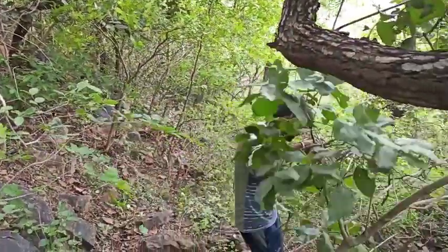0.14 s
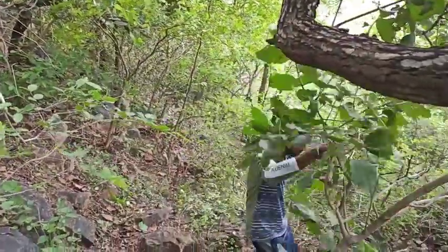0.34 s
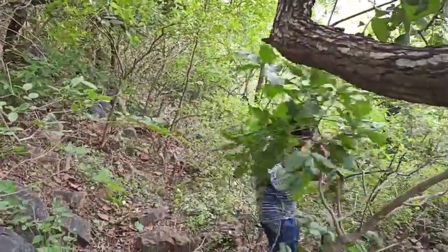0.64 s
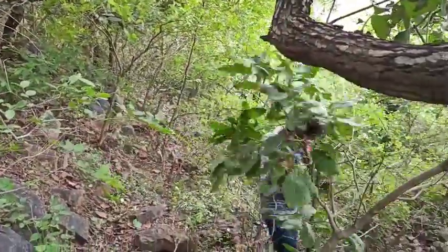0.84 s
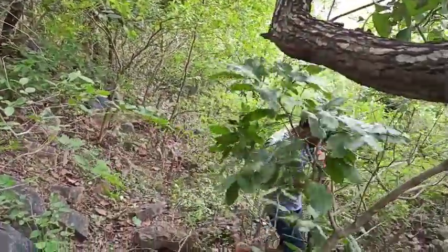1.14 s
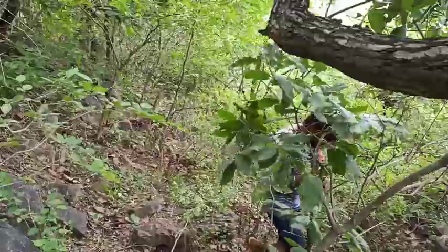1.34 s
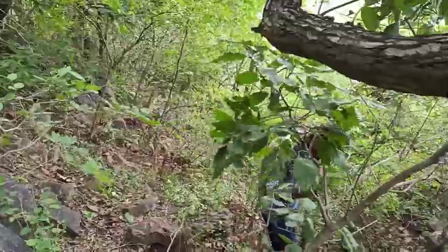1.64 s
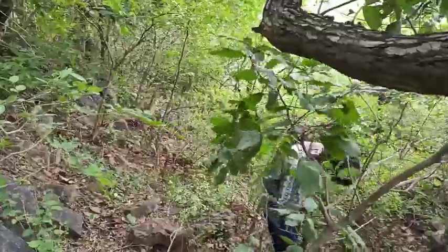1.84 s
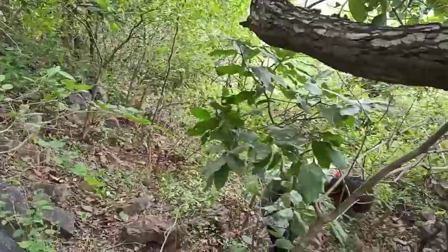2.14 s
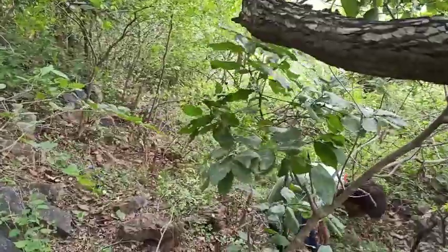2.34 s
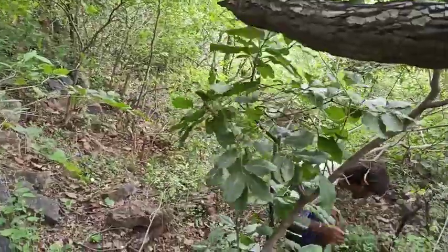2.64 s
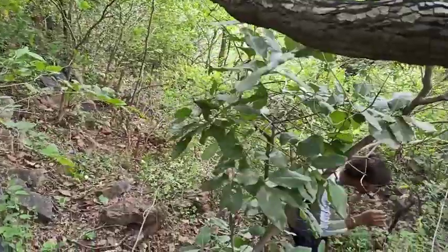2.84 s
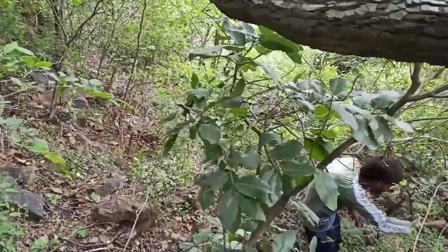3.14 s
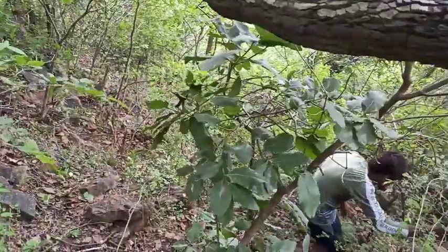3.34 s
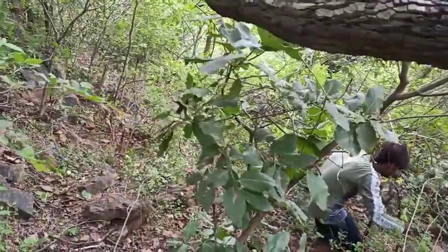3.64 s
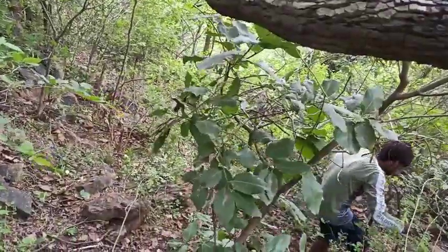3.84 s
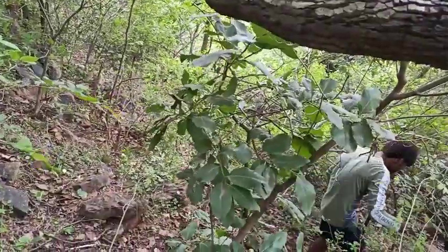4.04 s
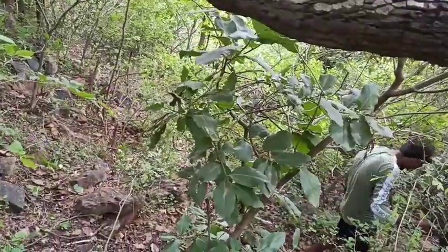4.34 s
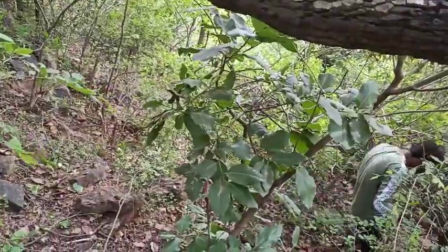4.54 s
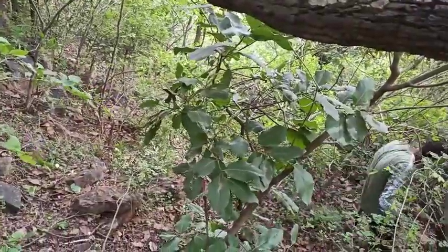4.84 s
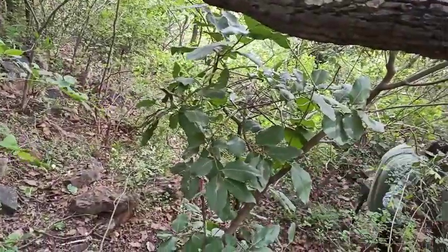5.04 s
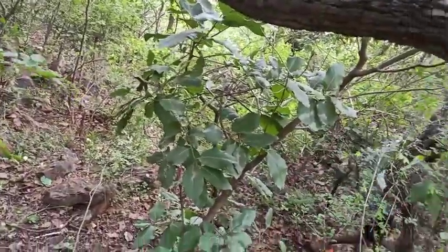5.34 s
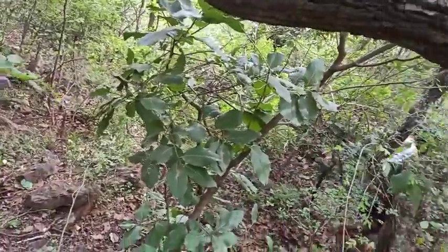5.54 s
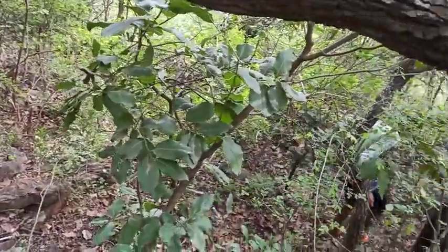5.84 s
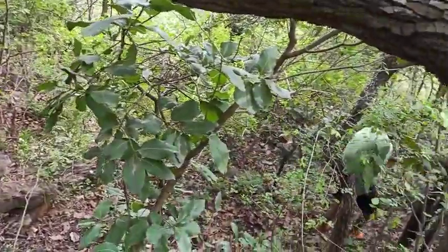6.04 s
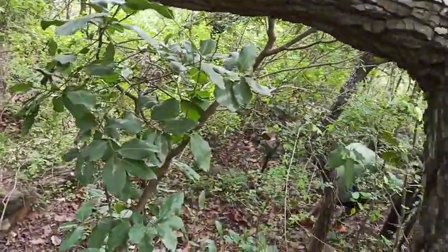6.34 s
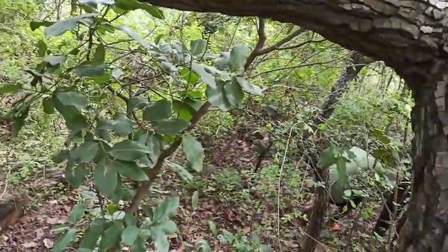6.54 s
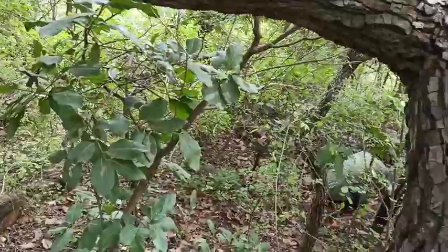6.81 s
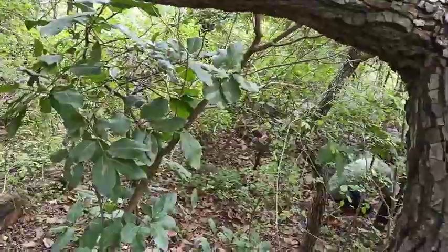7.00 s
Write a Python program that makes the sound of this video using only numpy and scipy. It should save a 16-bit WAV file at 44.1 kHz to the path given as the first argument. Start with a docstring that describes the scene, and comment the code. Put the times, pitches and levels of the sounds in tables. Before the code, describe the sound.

Someone pushes a leafy branch aside close to the microphone on a wooded slope. Two loud, sharp twig cracks come at about 0.1 and 0.3 seconds, with a burst of rustling and dull knocks from the bent bough. Leaves keep brushing and crackling while uneven footsteps crunch through dry litter. Between 2 and 2.5 seconds the bough knocks softly again amid small snaps. A cluster of crunches around 3.6 seconds ends in a clear snap at 3.8, and a heel thuds softly on soil at 4.6. The steps then grow quieter as the walker moves away, with light snaps near 5.2 and 6.1, continuing until about 7 seconds. Throughout, a distant engine idles faintly over a low drone. From 3.3 seconds a far insect gives short, high, scratchy buzzes, and from 4.8 a bird adds a few faint falling chirps.

```python
"""Someone pushes a leafy branch aside and climbs over dry leaf litter on a wooded slope, moving away.
Leaves crackle in dense grains, twigs snap (two loudly), a far engine idles over a low drone, a bird and an insect call faintly."""
import sys
import numpy as np
from scipy import signal
from scipy.fft import rfft, irfft, next_fast_len
from scipy.io import wavfile
from scipy.ndimage import uniform_filter1d, map_coordinates

SR = 44100
rng = np.random.default_rng(int(sys.argv[2]) if len(sys.argv) > 2 else 0)


def waveform_to_disk(signal):
    """Save audio, clipped to [-1, 1], as 16-bit WAV at the path in sys.argv[1]."""
    frames = np.transpose(np.atleast_2d(signal))
    scaled = np.clip(frames, -1, 1) * 32767
    samples = np.round(scaled).astype(np.int16)
    wavfile.write(sys.argv[1], SR, samples)


N = 316152

# how hard the leaves are stirred, fading as the walker climbs away: (s, crackling leaves dB, heavy stems dB above them)
RUSTLE = [(0, -45, -5), (.06, -49.5, -10), (.1, -35, -6.5), (.3, -41, -6), (.312, -30, -8), (.35, -40, -5), (.53, -49, -4), (.6, -45.5, -7), (.9, -44.5, -6), (1, -48, -6),
          (1.7, -48.5, -4), (2.15, -44, -5), (2.38, -47.5, -5.5), (2.43, -53.5, -7), (2.5, -49, -6.5), (2.85, -48, -6), (2.91, -51.5, -5), (3.0, -46.5, -10), (3.14, -53, -6),
          (3.38, -46, -4.5), (3.7, -48, -10), (3.74, -50, -6), (3.82, -52.5, -3), (4.0, -57, -4), (4.75, -52.5, -8.5), (5.1, -55, -6.5), (5.4, -55, -4),
          (5.78, -58, -4), (6.2, -54, -6), (6.8, -60, -1.5), (7.17, -56.5, -3)]
STEMS = [(530, -26), (900, 2), (1280, 1), (1640, 3.5), (2530, 0.5), (3200, -20.5), (4160, -25.5), (7040, -120)]  # (Hz, dB per Hz)
CRACKLE = [(2200, -31.5), (2800, -6), (3800, 0), (4600, -0.5), (5000, -7.5), (5900, -6), (6200, -54)]  # (Hz, dB per Hz)
CRISP = [(5700, -29), (6200, -1), (7500, -3.5), (7900, -7), (8500, -3), (11800, -13), (13200, -10.5), (16000, -14)]  # (Hz, dB per Hz)
# twig snaps: (s, peak dB, wood dB above it, crisp dB above it, wood pitch Hz, splinter pitch Hz, left-right dB)
SNAPS = [(0.0767, -10.5, -14, 10, 1930, 3155, 1.5), (0.1469, -23, -12.5, -7, 850, 4630, -5),
         (0.291, -32.5, -8, 1.5, 1130, 4420, -13), (0.3049, -15, -12, 6, 1780, 3960, -3),
         (0.361, -36.5, 2, -6, 1310, 4690, 3), (0.899, -34, -8.5, 2, 2010, 4150, -1),
         (1.2408, -35.5, -8.5, -13, 1330, 3540, 0.5), (2.1775, -32, 3.5, 3.5, 1740, 3400, 2), (2.287, -37.5, 2.5, 0, 980, 4450, 2),
         (2.314, -32.5, -17, 3.5, 1810, 3690, 1), (2.4615, -31, -3.5, -3, 930, 3720, -2.5), (2.4906, -37, -19.5, -8, 2180, 4800, -2),
         (2.9456, -40, -16, -11, 907, 4190, 0.5), (2.993, -37, -11, 0.5, 869, 4470, 1.5), (3.0718, -43, -9, 9, 1100, 4040, -3),
         (3.1, -30.5, -19, 0.5, 2560, 4200, 6.5), (3.7102, -36, -18, -5, 1210, 3340, 1.5),
         (3.7942, -22.5, -14, -0.5, 1900, 4680, -0.5), (4.8093, -37, -8.5, 1, 1240, 4680, -1),
         (5.1555, -32, -13, -0.5, 966, 3840, -3), (5.2796, -39, -14, -16, 974, 4100, 0.5),
         (6.1006, -40, -8.5, -12, 1180, 4560, 1), (6.1488, -40, -5, 0.5, 1230, 3600, -0.5), (6.176, -38.5, -9, -12, 853, 3560, 1)]
WOOD = [(500, -21), (900, -3.5), (1500, -4.5), (2200, -2.5), (3000, -18)]  # a snapping twig's body: (Hz, dB per Hz)
THUDS = [(4.599, -22.5)]  # heel on soil: (s, peak dB)
CYCLE = [(0, 12.9), (1.5, 13.2), (2.5, 13.6), (3.7, 12.9), (7.17, 12.9)]  # (s, engine cycles Hz)
ORDERS_DB = [(5, -17), (6, 2), (7, -1.5), (8, -15.5), (9, -15.5), (11, -11.5), (12, -11), (13, -18), (14, -11.5), (15, -9), (16, -17)]  # (multiple of the cycle, dB)
DRONE = [(24, -29), (50, -22.5), (65, -10.5), (96, -2.5), (149, -4.5), (414, -8.5), (549, -17.5), (752, -13), (839, -13),
         (937, -18.5), (1220, -17), (1430, -35), (1700, -46), (2210, -50), (3740, -120)]  # (Hz, dB per Hz)
HOWL = [(0, 653.3, -51.5), (3.5, 670.3, -64.5), (4.6, 770.3, -59), (7.17, 766.3, -55)]  # a hollow band in the drone: (s, Hz, dB)
DRONE_ALIKE = [(60, 0.91), (300, 0.81), (700, 0.71), (1400, 0.67)]  # (Hz, left-right likeness)
CHIRPS = [(4.82, 3700, 3200, .03, -54), (4.96, 4000, 3500, .03, -58), (5.69, 3400, 3100, .03, -57), (6.228, 4050, 3400, .05, -53), (6.268, 3400, 2950, .02, -52), (6.652, 4050, 3450, .045, -54)]  # (s, from Hz, to Hz, length s, dB) fixed
TOP_HZ = 16450  # fixed
BANDS = (STEMS, CRACKLE, CRISP)
# handfuls of leaves crushed at once: (s, crackling leaves dB, stems dB above them, crisp dB above them, length s)
CRUNCHES = [(0.383, -41.5, -13, 1.5, 0.13), (0.553, -41, -6, -0.5, 0.087), (0.701, -46, -5, 5, 0.092), (0.811, -43, -9, -2, .06), (0.883, -46, -6, 6, .05),
            (1, -45, -17, -10, .04), (1.094, -46, -7, 1, 0.085), (1.404, -43.5, -7, 0, 0.046), (1.49, -45, -10, 0, 0.053), (1.636, -47, -13, 6.5, .05),
            (1.759, -43, -2, 2, 0.052), (1.794, -40, -5, 0, 0.035), (2.023, -51, -8, -8, .04), (2.121, -35, -12, -3, .04),
            (2.244, -43, 5, -2, 0.03), (2.317, -41, -10, -6, .04), (2.381, -43.5, 0.5, -2, 0.037), (2.492, -45.5, 1, 0, 0.043), (2.84, -47.5, -4, 3, 0.041),
            (2.929, -48.5, -2, 8.5, 0.081), (3.049, -45.5, -10, 6, .04), (3.298, -42.5, -14, -2, .05), (3.39, -44, -15, -3, .035),
            (3.568, -40.5, -8, 3, 0.089), (3.652, -43, -6.5, 3, 0.087), (3.7563, -38, -7.5, -1, 0.042),
            (4.241, -47.5, -9, 0.5, 0.059), (4.4715, -42, -9, 2, 0.12), (4.82, -44, -11, -6, 0.04), (5.22, -47, -5, 1, 0.096), (5.52, -50.5, -6, -2, 0.063),
            (5.683, -49.5, -5, 0, 0.03), (5.826, -48.5, -13, -4, 0.053), (5.922, -47.5, -10, 3.5, .05),
            (5.945, -45, -7.5, 2.5, 0.078), (6.096, -51.5, -7, -2, .06), (6.323, -47, -3.5, -2, 0.042), (6.912, -53, -3, -3, 0.059), (7.05, -53, -4, 5, 0.12)]
BOUGH = [(.14, -37.5), (.19, -45), (.31, -38), (.36, -52), (2.18, -47), (2.28, -41)]  # the bent bough knocks: (s, dB)
BOUGH_SOUND = [(180, -29), (260, 3), (420, 5), (650, -6), (900, -35)]  # (Hz, dB per Hz)
GAP = [(8450, 0), (8600, -16), (9000, -24), (9400, -52), (11350, -60), (11550, 0), (15450, 0), (15700, -28)]  # (Hz, dB) fixed
INSECT = [(3.33, .1, -48), (4.107, 0.051, -51), (4.2, 0.17, -52), (4.35, 0.073, -50), (4.658, 0.054, -61), (5.57, .07, -55), (6.465, 0.082, -51.5), (6.72, 0.071, -49)]  # swells of a far insect: (middle s, length s, dB)
INSECT_SOUND = [(5900, -20), (6150, -3), (6800, 0), (7500, -2), (7750, -20)]  # (Hz, dB per Hz) fixed
CRISP_DB = 2  # thin crisp leaves over the crackling ones
CLUMPS_DB, OWN_DB = 1.47, 0.54  # depth of the flutter that all leaves share, and of each size's own
RISE, FALL = 0.18, 2.3  # a crunch: rise as a share of its length, fall in nepers over its length
SPLINTER_S = 0.026  # t60 of a twig's splintering
KNOCK_RISE_S, KNOCK_S = 0.0081, 0.34  # rise, t60


def amp(db):
    """Decibels to gain."""
    return 10 ** (np.asarray(db) / 20)


def unit(x):
    """Scaled to rms 1."""
    return x / np.sqrt(np.mean(x ** 2) + 1e-20)


def along(points, hz):
    """(Hz, value) points on a log axis."""
    f, v = np.transpose(points)
    return np.interp(np.log(hz + 1), np.log(f + 1), v)


def curves(rows):
    """One value per sample for each column after the time."""
    s, *cols = np.transpose(rows)
    return [np.interp(np.arange(N) / SR, s, c) for c in cols]


def wobble(rate):
    """A smooth random curve, rate knots a second."""
    return map_coordinates(rng.standard_normal(int(N * rate / SR) + 4), [np.arange(N) * rate / SR])


def filtered(x, response):
    """x times a response of frequency."""
    m = next_fast_len(N + SR // 2)
    return irfft(rfft(x, m) * response(np.fft.rfftfreq(m, 1 / SR)), m)[..., :N]


def coloured(x, spectrum):
    """x through a spectrum that keeps the power of white noise."""
    shape = lambda hz: amp(along(spectrum, hz)) * (hz > spectrum[0][0]) * (hz < spectrum[-1][0])
    return filtered(x, lambda hz: unit(shape(hz)))


def heard_by_both(x, shared):
    """One source at two ports: part reaches both, the left a little late; the rest is each port's own."""
    shared = np.clip(shared, 0, 1)
    common = np.array([np.roll(x[0], 5), x[0]])  # fixed
    return np.sqrt(shared) * common + np.sqrt(1 - shared) * x[1:]


def grains(rate, spread_db, cycles):
    """Leaf cracks: each rings a few cycles at its own pitch; most are small, a few large."""
    when, pitch, size, phase = rng.random((round(rate * N / SR), 4)).T[:, :, None]
    hz, n = 900 * (15500 / 900) ** (pitch ** .7), np.arange(128)  # fixed
    turns = hz * n / SR
    rings = amp(-spread_db * np.log(1.003 - size)) * np.sqrt(hz) * np.exp(-turns / cycles) * np.sin(2 * np.pi * (turns + phase))
    return unit(np.bincount((np.int64(when * N) + n).ravel(), rings.ravel())[:N])


def rustle():
    """Brushing and treading shake all sizes of leaf together; they flutter, and crunches add quick swells."""
    level_db, stems_db = curves(RUSTLE)
    levels = level_db + np.array([stems_db, np.zeros(N), np.full(N, CRISP_DB)]) + CLUMPS_DB * wobble(30)
    power = amp(1.987 * (levels + OWN_DB * np.array([wobble(20) for _ in BANDS])))
    t = np.arange(SR // 3) / SR
    for s, db, stems_db, crisp_db, length in CRUNCHES:
        swell = (1 - np.exp(-t / length / RISE)) * np.exp(-FALL * t / length)
        swell = swell / swell.max()
        at = power[:, round(s * SR):][:, :len(t)]
        at += amp(2 * (db + np.array([stems_db, 0, crisp_db])))[:, None] * swell[:at.shape[1]] ** 2
    source = leaves(cracks_db=-5.5, bed_db=0.5)
    return sum(np.sqrt(p) * coloured(source, band) for p, band in zip(power, BANDS))


def snaps():
    """Each twig clicks, splinters for a few ms and rings briefly; shaken leaves and the trees around trail after it."""
    t = np.arange(SR // 6) / SR
    layers, rings = np.zeros((3, 2, N + len(t))), np.zeros((2, N + len(t)))
    tail = amp(np.array([-13, -12, -18])[:, None, None] - 60 * t / 0.3)  # the trail is duller than the snap
    for s, db, wood_db, crisp_db, wood_hz, splinter_hz, pan_db in SNAPS:
        shape = (1 - np.exp(-(t / .0008) ** 2)) * (amp(4 - 60 * t / .006) + amp(-60 * t / SPLINTER_S) + tail)  # fixed
        pan = amp([[pan_db / 2], [-pan_db / 2]])
        burst = heard_by_both(rng.standard_normal((3, len(t))), shared=0.25)
        gains = amp(db + np.array([wood_db - 1.0, -3.5, crisp_db - 0.5]))
        layers[..., round(s * SR):][..., :len(t)] += gains[:, None, None] * shape * burst * pan
        wood = amp(db + wood_db + 7.5 - 60 * t / 0.017) * np.sin(2 * np.pi * wood_hz * t)
        splinter = amp(db + 6.0 - 60 * t / 0.021) * np.sin(2 * np.pi * splinter_hz * t)
        ring = (1 - np.exp(-(t / .0008) ** 2)) * (wood + splinter)  # fixed
        rings[:, round(s * SR):][:, :len(t)] += pan * [np.roll(ring, 5), ring]  # fixed
    return rings[:, :N] + sum(coloured(x[:, :N], band) for x, band in zip(layers, (WOOD, CRACKLE, CRISP)))


def thuds():
    """A heel gives the soil one soft low push."""
    out, t = np.zeros(N + SR), np.arange(SR // 5) / SR
    for s, db in THUDS:
        out[round(s * SR):][:len(t)] += amp(db - 60 * t / 0.098) * (1 - np.exp(-t / 0.012)) * np.sin(2 * np.pi * 100 * t)
    return out[:N]


def engine():
    """Low orders of the firing cycle; the air between makes each one waver, a little apart at the two ports."""
    turns = np.cumsum(curves(CYCLE)[0]) / SR
    apart = 0.044 * wobble(2.9) * [[1], [-1]]
    return amp(-49.5) * sum(amp(db + 3.1 * wobble(3.7)) * np.sin(2 * np.pi * (k * turns + 0.048 * wobble(3.09) + apart)) for k, db in ORDERS_DB)


def drone():
    """Far low noise, nearly alike at both ports, with a hollow band that slides up."""
    pair = rng.standard_normal((2, N))
    turn = lambda hz: np.arccos(np.clip(along(DRONE_ALIKE, hz), -1, 1)) / 2
    mid, side = filtered(pair, lambda hz: amp(along(DRONE, hz)) * [np.cos(turn(hz)), np.sin(turn(hz))])
    howl_hz, howl_db = curves(HOWL)
    slow = filtered(rng.standard_normal((3, N)), lambda hz: 1 / (1 + (hz / 55) ** 2))
    band = unit(slow * np.sin(2 * np.pi * np.cumsum(howl_hz) / SR))
    howl = amp(howl_db) * (0.75 * band[0] + 0.5 * band[1:])
    return amp(-46.0 + 0.27 * wobble(2.3)) * unit(np.array([mid + side, mid - side])) + howl


def bird():
    """Short falling whistles."""
    out = np.zeros(N + SR)
    for s, from_hz, to_hz, length, db in CHIRPS:
        n = round(length * SR)
        glide = np.cumsum(np.linspace(from_hz, to_hz, n)) / SR
        out[round(s * SR):][:n] += amp(db) * np.hanning(n) * np.sin(2 * np.pi * glide)
    return out[:N]


def leaves(cracks_db, bed_db):
    """Cracks over a bed of far leaves, at both ports."""
    cracks = np.array([grains(rate=850, spread_db=2.0, cycles=4.2) for _ in range(3)])
    both = heard_by_both(amp(cracks_db) * cracks + amp(bed_db) * rng.standard_normal((3, N)), shared=0.17)
    return patchy(both, depth_db=2.0)


def bough():
    """Dull woody noise, swelling and dying after each knock."""
    t = np.arange(N) / SR
    since = [np.maximum(t - s, 0) for s, _ in BOUGH]
    level = sum((1 - np.exp(-u / KNOCK_RISE_S)) * amp(db - 60 * u / KNOCK_S) for u, (_, db) in zip(since, BOUGH))
    knocks = coloured(rng.standard_normal((2, N)), BOUGH_SOUND)
    return level * (knocks[0] + 0.15 * knocks[1] * [[1], [-1]])


def patchy(x, depth_db):
    """Random patches of pitch and time stand out, as single leaves and sprigs take turns."""
    z = signal.stft(x, nperseg=512)[2]
    field = uniform_filter1d(uniform_filter1d(rng.standard_normal(z.shape[1:]), size=2, axis=0), size=7, axis=1)
    return unit(signal.istft(z * amp(depth_db * unit(field)), nperseg=512)[1][:, :N])


def insect():
    """A scratchy high buzz, some two hundred strokes a second, in short swells."""
    t = np.arange(N) / SR
    level = sum(amp(db) * np.interp(t, [s - length, s, s + length], [0, 1, 0]) for s, length, db in INSECT)
    strokes = amp(2.6 * np.sin(2 * np.pi * 200 * t + 3 * wobble(30)))
    return level * unit(coloured(strokes * rng.standard_normal((2, N)), INSECT_SOUND))


def scene():
    """All sources at the two ports."""
    return rustle() + snaps() + bough() + thuds() + engine() + drone() + bird() + insect()


def record(dry):
    """The loudest snap clips; a band of the treble is almost silent; nothing passes above the limit."""
    clipped = dry / (1 + np.abs(dry / 1.1) ** 6) ** (1 / 6)  # fixed
    return filtered(clipped, lambda hz: amp(along(GAP, hz)) * (hz < TOP_HZ))


dry = scene()
out = record(dry)
waveform_to_disk(out)
```